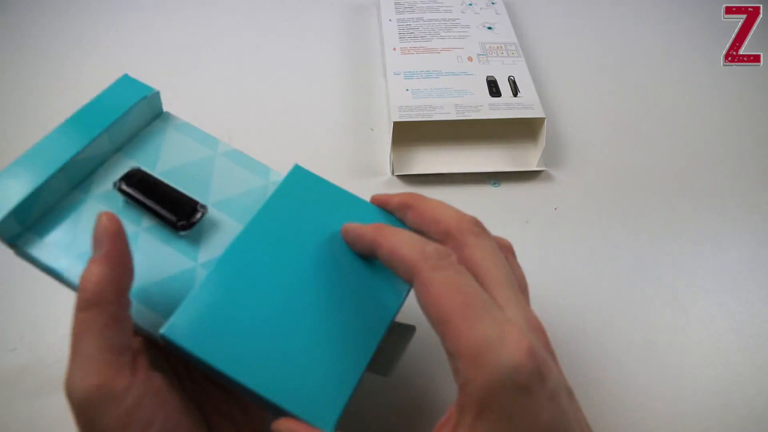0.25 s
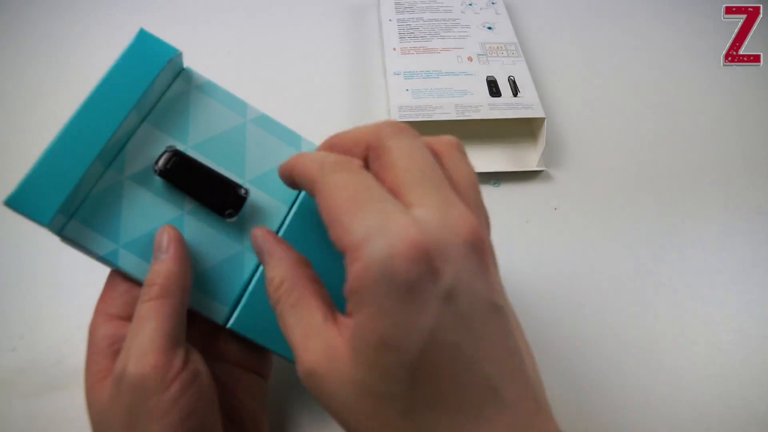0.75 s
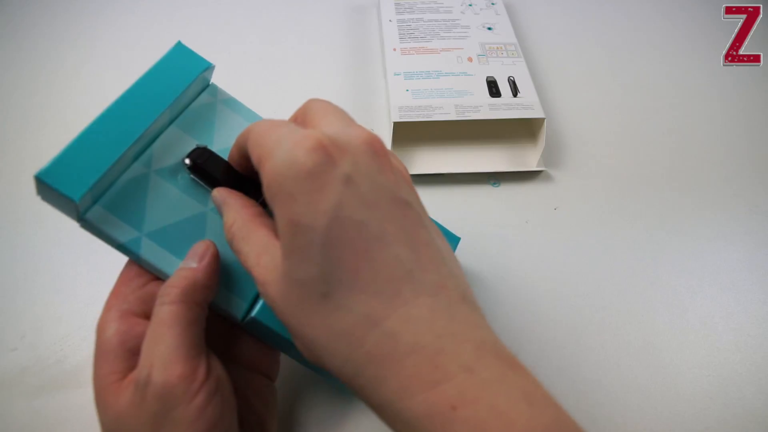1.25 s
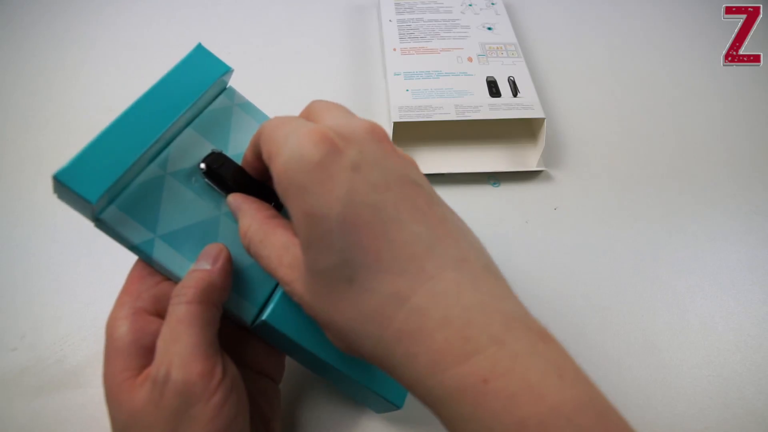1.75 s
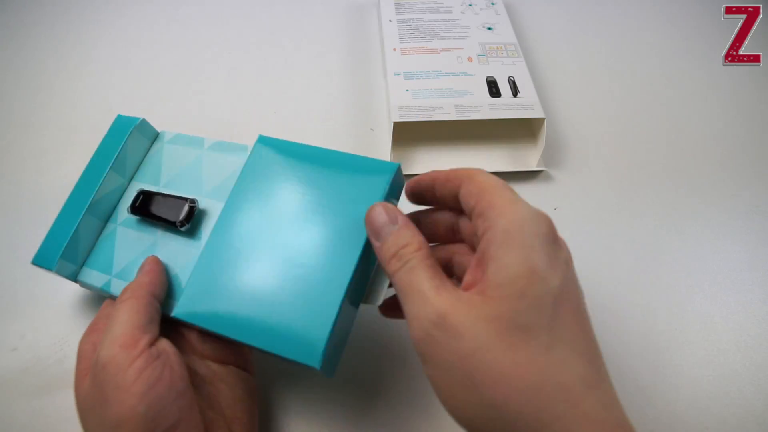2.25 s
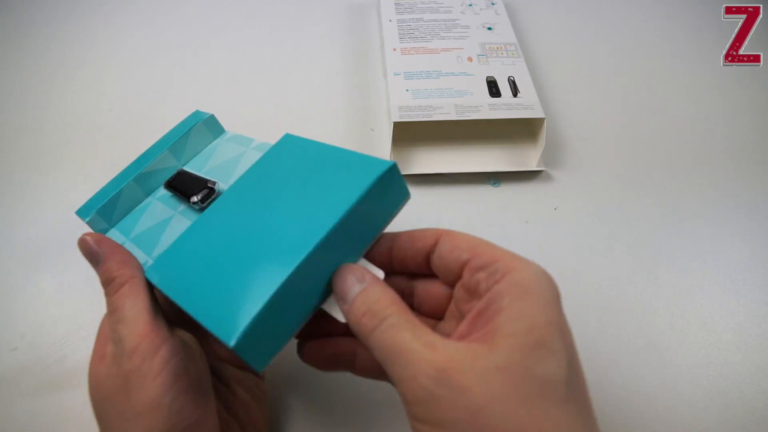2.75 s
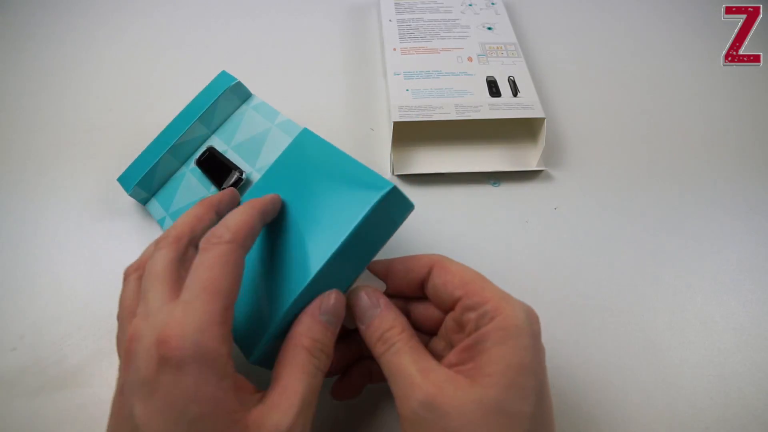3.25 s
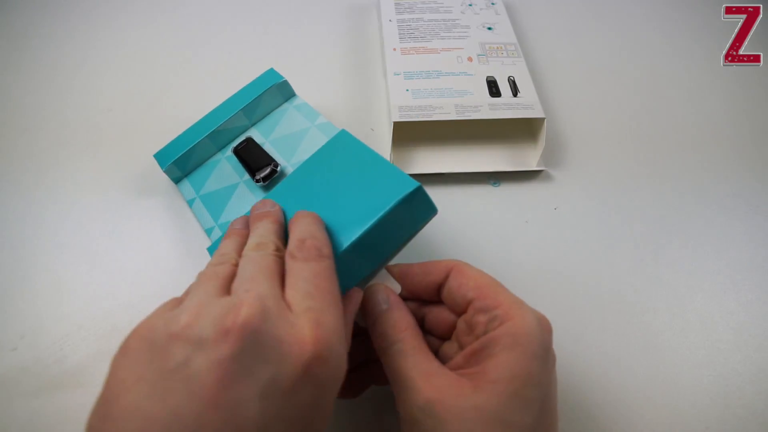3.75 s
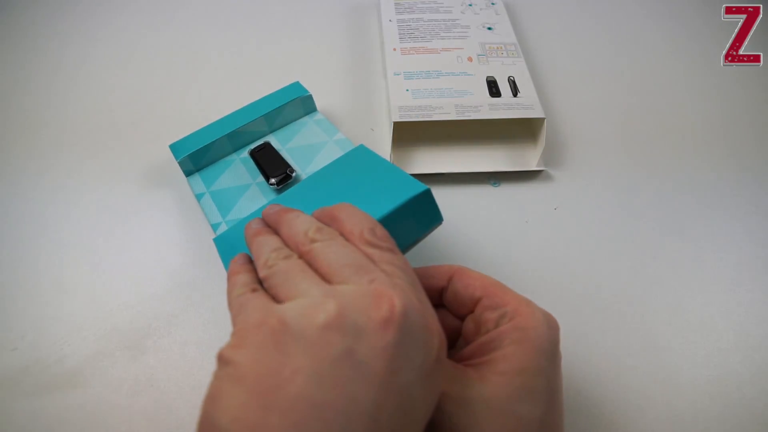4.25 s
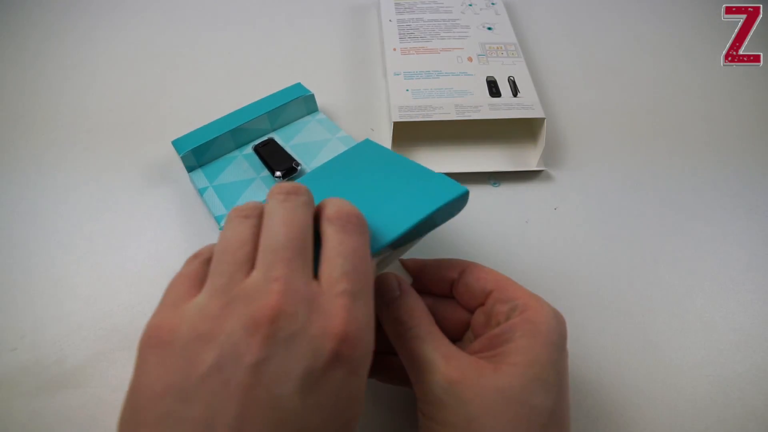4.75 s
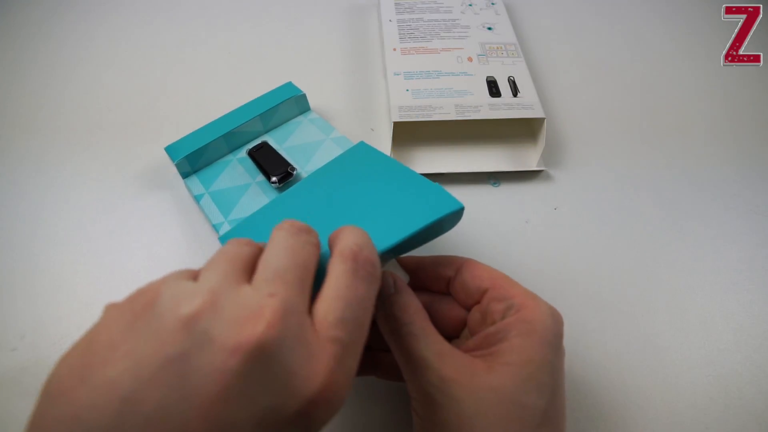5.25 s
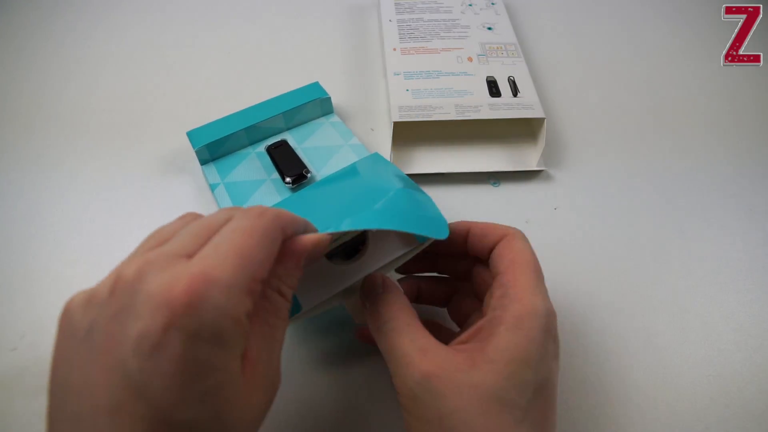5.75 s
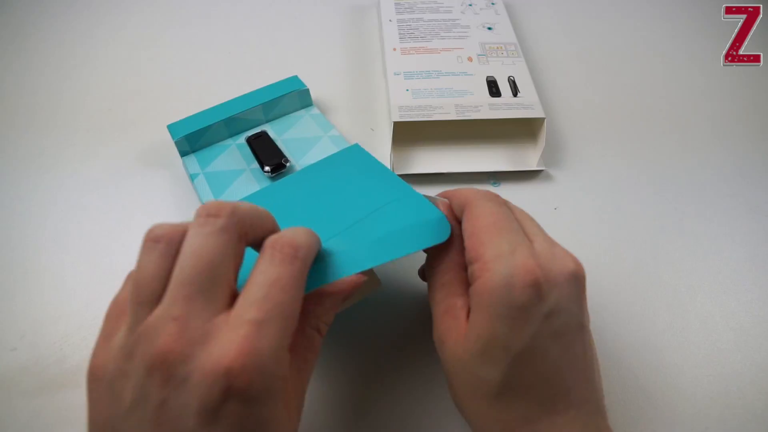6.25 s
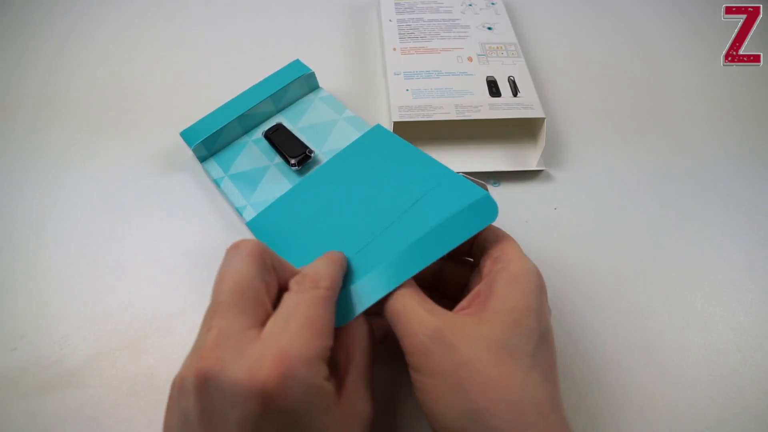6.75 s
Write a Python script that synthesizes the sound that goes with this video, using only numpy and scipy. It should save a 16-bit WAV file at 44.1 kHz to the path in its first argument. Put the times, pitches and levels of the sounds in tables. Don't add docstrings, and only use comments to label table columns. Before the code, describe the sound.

Close handling of a little card box: dry rubs, hollow pats, creasing ticks, a table rap, and a loud crack as a flap springs open.

```python
import sys
import numpy as np
from scipy import signal
from scipy.fft import rfft, irfft, next_fast_len
from scipy.io import wavfile
from scipy.ndimage import uniform_filter1d, map_coordinates

SR = 44100
rng = np.random.default_rng(int(sys.argv[2]) if len(sys.argv) > 2 else 0)


def to_wav(sig):
    pcm = np.clip(np.atleast_2d(sig), -1, 1) * 32767
    pcm = np.round(pcm).astype(np.int16)
    wavfile.write(sys.argv[1], SR, pcm.T)


def volts_from_db(level):
    exponent = np.asarray(level, float) / 20
    return 10 ** exponent


N = 308259


def unit(x):
    return x / np.sqrt(np.mean(x ** 2) + 1e-20)


def along(points, hz):
    f, v = np.transpose(points)
    return np.interp(np.log(hz + 1), np.log(f + 1), v)


def wobble(rate):
    knots = rng.standard_normal(int(N * rate / SR) + 4)
    return map_coordinates(knots, [np.arange(N) * rate / SR])


def filtered(x, response):
    m = next_fast_len(N + SR // 2)
    return irfft(rfft(x, m) * response(np.fft.rfftfreq(m, 1 / SR)), m)[:N]


def ring(x, modes):
    lo, hi = 0.42 * modes[0][0], 1.24 * modes[-1][0]

    def shape(f):
        total = 0
        for k, (center, width, db) in enumerate(modes):
            mode = 1j * f * width / (center * center - f * f + 1j * f * width)
            total = total + (-1) ** k * volts_from_db(db) * mode
        return total * 1j * f / (lo + 1j * f) / (1 + 1j * f / hi) ** 2

    def leveled(f):
        response = shape(f)
        return response / np.sqrt(np.mean(abs(response) ** 2))

    return filtered(x, leveled)


def grit(per_s, spread_db, smooth):
    size = volts_from_db(spread_db * np.minimum(rng.exponential(size=N), 2))
    slips = (rng.random(N) < per_s / SR) * size * rng.standard_normal(N)
    return unit(unit(slips) + smooth * rng.standard_normal(N))


def patchy(x, depth_db):
    z = signal.stft(x, nperseg=512)[2]
    field = uniform_filter1d(rng.standard_normal(z.shape), size=4, axis=0)
    field = uniform_filter1d(field, size=9, axis=1)
    return unit(signal.istft(z * volts_from_db(depth_db * unit(field)), nperseg=512)[1][:N])


def lone_modes(rows, waver):
    out, t = np.zeros(N + SR), np.arange(SR // 3) / SR
    for s, hz, db, rise, t60 in rows:
        drift = np.cumsum(rng.standard_normal(len(t)))
        phase = 2 * np.pi * hz * t + waver * np.sqrt(hz / 1000) * drift
        onset = 1 - np.exp(-(t / rise) ** 2)
        out[round(s * SR):][:len(t)] += volts_from_db(db - 60 * t / t60) * onset * np.sin(phase)
    return out[:N]


def contacts(rows, bodies, card_gain_db, hollow_gain_db, crackle_gain_db, blow):
    force, t = np.zeros((2, 3, N + SR)), np.arange(SR // 8) / SR
    for s, card_db, hollow_db, crackle_db, t60 in rows:
        burst = volts_from_db(-60 * t / np.clip(t60, .002, .12)) * rng.standard_normal((3, len(t)))
        burst[:, 0] = blow * np.linalg.norm(burst, axis=1)
        burst /= np.linalg.norm(burst, axis=1, keepdims=True)
        levels_db = [card_db + card_gain_db, hollow_db + hollow_gain_db, crackle_db + crackle_gain_db]
        size = np.sqrt(0.00057 * SR) * volts_from_db(levels_db)
        force[0, :, round(s * SR):][:, :len(t)] += size[:, None] * burst
        force[1, :, round(s * SR)] += size
    return np.array([sum(ring(f[:N], modes) for f, modes in zip(path, bodies)) for path in force])


# start_s, pressure_db
GRIP_PRESSURE = [(0, -55), (.37, -61), (.6, -58.5), (.66, -65), (.97, -76), (1.2, -57.5), (1.42, -55.5),
                 (1.52, -70), (1.62, -72), (1.95, -64), (2.45, -62), (2.72, -60.5), (3.2, -54.5),
                 (3.5, -62), (3.7, -53), (4.8, -57.5), (5.5, -56.5), (6.99, -57)]


def strokes(under_db, sudden, even, held, building=()):
    t = np.arange(N) / SR
    grip_db = np.interp(t, *np.transpose(GRIP_PRESSURE))
    power = volts_from_db(2 * (grip_db + np.reshape(under_db, (2, 1))))
    sudden_s, edge_s = 0.0043, 0.012
    shaped = [(r, sudden_s, 0, r[1]) for r in sudden]
    shaped += [(r, r[1], 0, r[1]) for r in even]
    shaped += [(r, r[1], 0, sudden_s) for r in building]
    shaped += [(r, edge_s, abs(r[1]), edge_s) for r in held]
    for (s, _, *peak_db), rise, hold, fall in shaped:
        first = max(round((s - 4 * abs(rise)) * SR), 0)
        near = slice(first, round((s + hold + 4 * abs(fall)) * SR))
        before = np.maximum(s - t[near], 0)
        after = np.maximum(t[near] - s - hold, 0)
        slope_db = -10 * (before / (abs(rise) + 1 / SR) + after / (abs(fall) + 1 / SR))
        power[:, near] += volts_from_db(2 * (np.reshape(peak_db, (2, 1)) + slope_db))
    return 10 * np.log10(power)


# pitch_hz, density_db (dB per Hz)
HUSH_SPECTRUM = [(15, -24), (27, 0), (40, 1.5), (68, -12.5), (200, -19), (600, -17.5), (1500, -23.5),
                 (4000, -34.5), (8000, -37.5), (15800, -41)]
# pitch_hz, level_db (rms)
WHINE_TONES = [(2000, -78), (3000, -81.5), (4000, -88)]


def room_tone():
    noise = filtered(rng.standard_normal(N), lambda hz: volts_from_db(along(HUSH_SPECTRUM, hz)))
    hush = volts_from_db(-58.5 + 0.14 * wobble(2.83)) * unit(noise)
    t = np.arange(N) / SR
    return hush + sum(volts_from_db(db + 2.5) * np.sin(2 * np.pi * hz * t) for hz, db in WHINE_TONES)


# pitch_hz, t60_s
ROOM_DECAY = [(200, 0.15), (1000, 0.26), (4000, 0.28), (12000, 0.2)]


def room(x):
    out, step, delay = np.zeros(N + SR), SR // 3, 130
    for a in range(0, N, step):
        hz, t, z = signal.stft(rng.standard_normal(SR // 2), SR, nperseg=256)
        decay = volts_from_db(-60 * t / along(ROOM_DECAY, hz)[:, None])
        tail = signal.istft(z * decay, SR, nperseg=256)[1]
        wet = signal.fftconvolve(x[a:a + step], tail / np.linalg.norm(tail))
        out[a + delay:][:len(wet)] += wet[:N + SR - a - delay]
    return out[:N]


# start_s, pitch_hz, level_db, rise_s, t60_s
TABLE_PUSHES = [(.182, 434, -35, 0.003, 0.091), (.3, 270, -46, 0.0091, 0.095),
                (2.15, 125, -52, 0.039, 0.46), (2.511, 189, -42.5, 0.0032, 0.12),
                (3.047, 180, -40, 0.0024, 0.17), (3.346, 135, -31, 0.0092, 0.13),
                (3.359, 375, -39, 0.002, 0.06), (3.42, 370, -46, .003, .08),
                (3.376, 123, -32.5, 0.0039, 0.21), (3.376, 361, -35.5, 0.0016, 0.069),
                (3.92, 194, -46, 0.0049, 0.1), (4.525, 195, -47.5, 0.0024, .1), (4.88, 150, -54, .01, 0.16),
                (3.16, 130, -47, .01, 0.155), (3.76, 349, -48, .01, 0.2), (4.09, 477, -39, 0.0068, 0.16),
                (4.965, 233, -47.5, 0.0056, .12), (5.43, 171, -53, 0.0091, 0.16),
                (5.66, 190, -51, .005, 0.11), (3.29, 420, -44, .008, .12), (3.24, 300, -49, .01, .15),
                (3.47, 128, -48, .02, .3), (3.62, 280, -50, .01, .15), (4.18, 300, -50, .01, .2)]


def table_booms():
    return lone_modes(TABLE_PUSHES, waver=0.03)


# pitch_hz, width_hz, level_db
SQUEAK_BAND = [(4400, 3600, -1), (5640, 800, 6), (6900, 880, 0)]
# pitch_hz, width_hz, level_db
AIR_BAND = [(9100, 2600, -2.5), (11600, 2900, -4), (13900, 2300, -10.5)]
# start_s, fade_s (per 10 dB), squeak_db, air_db
SUDDEN_SLIPS = [(0.001, .08, -68, -66), (1.617, -0.3, -67, -83), (1.804, -0.04, -55, -72),
                (2.26, 0.6, -63, -75), (2.89, 0.4, -58, -68), (3.536, 0.04, -61, -80),
                (3.942, -0.02, -42, -66), (4.372, 0.06, -44.5, -56), (5.0585, .06, -57, -63),
                (4.98, .06, -62, -67), (5.193, .04, -56, -75), (5.159, .03, -62, -75),
                (5.538, 0.45, -64, -70), (6.572, 0.03, -48, -51)]
# peak_s, slope_s (per 10 dB), squeak_db, air_db
EVEN_GLIDES = [(.27, 0.02, -55, -63), (1.283, 0.02, -62, -72), (1.45, 0, -68, -73), (2.02, 0, -75, -76),
               (2.17, -0.03, -64, -61.5), (2.45, -0.1, -58, -69), (2.67, 0, -59.5, -77),
               (3.02, 0.14, -62.5, -72), (4.876, 0.12, -61, -72), (5.22, 0, -57, -77),
               (5.485, 0.04, -51.5, -71), (5.6, 2, -63.5, -79), (6.247, 0.03, -44, -58),
               (6.357, 0.025, -45, -55), (6.92, 0.1, -55, -66.5)]
# start_s, length_s, squeak_db, air_db
STEADY_SLIDES = [(0.145, .2, -60, -72), (0.413, 0.063, -59, -65), (2.799, 0.065, -55, -62.5),
                 (0.56, 0.069, -64, -72), (1.68, 0.065, -62.5, -82), (3.71, 0.4, -59.5, -74),
                 (3.832, .14, -53.5, -67), (3.87, 0.022, -49.5, -67), (4.47, 0.062, -49, -55.5),
                 (5.07, .04, -60, -70), (2.58, .12, -61, -78), (4.28, .04, -63, -74),
                 (5.448, 0.038, -54.5, -68), (5.88, 0.066, -56.5, -74), (6.014, 0.086, -44, -54.5),
                 (6.103, 0.053, -57, -74), (6.449, 0.049, -55.5, -68), (6.529, 0.12, -53.5, -66),
                 (6.747, 0.061, -54, -70), (6.84, 0.033, -54, -67.5)]


def sliding():
    squeak_db, air_db = strokes([-13, -29], SUDDEN_SLIPS, EVEN_GLIDES, STEADY_SLIDES)
    speed = wobble(35)
    squeak = volts_from_db(squeak_db - 5.5 + 1.65 * speed) * grit(4000, spread_db=3.5, smooth=0.91)
    air = volts_from_db(air_db - 3.5 + 1.5 * speed) * grit(4960, spread_db=-8.0, smooth=1.9)
    return ring(squeak, SQUEAK_BAND) + ring(air, AIR_BAND)


# pitch_hz, width_hz, level_db
BOX_HOLLOW = [(326, 76, -9), (465.5, 90, -3.5), (655.3, 41, 4.5), (809, 47, -3.5)]
# pitch_hz, width_hz, level_db
CARD_PANELS = [(1030, 362, 0), (1311, 159, 5), (1426, 240, 1.5), (1843, 390, -1.5), (2100, 390, -2),
               (2780, 426, -7), (3256, 580, -11)]
# start_s, fade_s (per 10 dB), hollow_db, card_db
CATCHING_RUBS = [(0.001, 0.1, -49, -58), (0.179, -0.02, -41, -48), (1.805, 0.03, -57, -46),
                 (1.917, 0.1, -55, -54), (2.1, 0.05, -50, -52.5), (2.272, 0.13, -49, -48.5),
                 (2.516, .04, -46, -45), (2.8, .07, -42, -51), (2.93, .06, -47, -51), (3.48, 0.2, -53, -61),
                 (5.194, .04, -52, -50), (5.879, .05, -42, -52), (1.623, .05, -60, -50),
                 (2.139, .05, -45, -52), (4.37, 0.26, -51, -40), (6.25, 0.06, -53, -48.5),
                 (6.665, 0.01, -46, -48)]
# peak_s, build_s (per 10 dB), hollow_db, card_db
BUILDING_RUBS = [
    (.61, 0.8, -52, -58.5),
    (1.462, 0.03, -47, -49.5),
    (3.015, 0.04, -43, -46),
    (5.12, 0.1, -52, -56),
]
# peak_s, slope_s (per 10 dB), hollow_db, card_db
SWELLING_RUBS = [(.27, 0.03, -47, -48), (1.045, 0.05, -51, -53), (3.33, 0.1, -48, -52),
                 (3.948, 0.06, -41, -43), (4.095, 0.03, -41, -43), (4.5, 0.12, -36.5, -42),
                 (5.085, 0.0851, -38, -48), (6.245, 0.04, -44, -47), (6.357, 0.04, -51, -47),
                 (6.877, 0.025, -40, -45)]
# start_s, length_s, hollow_db, card_db
STEADY_RUBS = [(0.218, 0.11, -49, -50.5), (4.374, 0.036, -52, -39), (4.45, 0.068, -52, -45),
               (0.488, 0.08, -47.5, -66), (1.144, 0.11, -58, -59), (1.28, .08, -58, -54),
               (1.692, 0.069, -56, -49), (1.95, .08, -49.5, -58), (2.152, 0.03, -50, -57),
               (3.545, 0.072, -49, -56), (3.993, 0.13, -45, -48), (4.9, 0.18, -49.5, -58.5),
               (4.85, .03, -55, -55), (4.95, .02, -56, -53), (5.623, 0.048, -48, -53.5),
               (5.745, .07, -50.5, -55), (5.886, 0.045, -49, -46), (6.01, 0.096, -52, -48.5),
               (6.569, 0.022, -49.5, -45), (6.604, 0.03, -56, -55), (6.75, .06, -46.5, -51),
               (6.84, 0.042, -44, -48), (6.903, 0.056, -52, -51)]


def rubbing():
    hollow_db, card_db = strokes([0.5, -0.4], CATCHING_RUBS, SWELLING_RUBS, STEADY_RUBS, BUILDING_RUBS)
    press = wobble(25)
    hollow_drag = patchy(grit(400, spread_db=2.5, smooth=0.9), depth_db=3.0)
    hollow = volts_from_db(hollow_db - 5.0 + 0.93 * press + 1.4 * wobble(30)) * hollow_drag
    card_drag = patchy(grit(350, spread_db=2.5, smooth=0.9), depth_db=3.0)
    card = volts_from_db(card_db - 1.38 + 0.49 * press + 1.75 * wobble(45)) * card_drag
    return ring(hollow, BOX_HOLLOW) + ring(card, CARD_PANELS)


# pitch_hz, width_hz, level_db
CARD_CRACKLE = [(4360, 2300, 6), (6070, 710, 9), (6900, 250, 4.5), (9280, 960, 2.5), (10200, 1940, -4.5),
                (13500, 3000, -41.5)]
# start_s, card_db, hollow_db
FINGER_PATS = [(.0604, -60, -38), (.265, -33, -30), (0.3274, -35, -65), (0.7907, -39.5, -70),
               (.8774, -59, -41.5), (.9414, -50, -38.5), (1.038, -33, -38), (1.3748, -39, -43),
               (1.4454, -36, -36), (1.453, -31, -35), (1.03, -37, -48), (1.6237, -33.5, -46),
               (1.7, -43, -54), (1.723, -26, -39), (1.749, -41, -43), (1.7105, -28, -54),
               (1.7365, -27, -48), (1.694, -31, -50), (1.753, -30, -50), (1.167, -38, -50),
               (1.198, -38, -50), (1.224, -38, -50), (1.531, -43, -55), (5.408, -41, -50),
               (5.611, -37, -46), (5.653, -34, -45), (5.742, -37, -46), (5.894, -31, -38),
               (6.004, -33, -44), (6.573, -31, -44), (2.922, -37, -44), (1.7887, -35, -55),
               (1.9524, -49, -42), (2.0086, -35, -48), (2.0826, -45, -40), (2.355, -42, -44.5),
               (2.5999, -37, -49), (1.9165, -27, -46), (2.2714, -36, -29.5), (2.4714, -36, -38.5),
               (2.5108, -25, -27), (3.0034, -37, -62.5), (3.2421, -35.5, -48), (3.409, -33, -79),
               (3.6242, -49, -42.5), (4.0385, -45, -32), (4.082, -31, -41), (4.9023, -50, -41),
               (4.9708, -55, -37), (5.0654, -42, -36), (5.4348, -37, -44), (5.4777, -35, -44.5),
               (5.6308, -41, -39), (5.6621, -40, -37), (6.223, -35, -51), (6.236, -30, -38),
               (5.8132, -40, -41), (5.9556, -28, -41), (6.8737, -37, -35)]
# start_s, card_db, hollow_db, crackle_db
CREASE_TICKS = [(.0144, -36, -70, -52), (.184, -29, -39, -53), (.2444, -46, -42, -58),
                (0.5975, -36, -36, -52), (1.616, -39, -60, -55), (1.6778, -25.5, -41.5, -49),
                (1.8033, -26.5, -33, -43), (2.0988, -29, -33, -49), (2.139, -29, -34, -49),
                (2.166, -45, -50, -50), (2.034, -51, -55, -58), (2.2576, -27.5, -36.5, -48),
                (2.388, -31, -39.5, -43), (2.4408, -34, -64, -45), (2.799, -36, -43, -51),
                (2.9317, -37, -38, -53), (3.19, -35, -44, -58), (3.3135, -33, -39, -50),
                (3.543, -32, -57, -60), (3.535, -47, -62, -49), (3.9316, -26, -32, -45),
                (3.9387, -34, -27.5, -44), (3.9948, -32, -30.5, -49.5), (5.099, -37, -50, -50),
                (5.538, -44, -57, -44.5), (5.1935, -29, -40, -48), (4.9797, -45, -50, -48),
                (5.0585, -45, -50, -47), (4.866, -48, -55, -54), (5.7693, -37.5, -45, -54),
                (5.8798, -30, -29, -45), (6.0117, -45, -56, -56), (6.358, -33, -40, -44),
                (6.567, -36, -41, -48), (6.6335, -34, -43, -52), (6.6625, -27, -32, -44),
                (6.784, -33, -48, -52), (6.8379, -26.5, -36, -40)]


def pats_and_ticks():
    crackle_under_card_db, pat_t60_s, tick_t60_s = -26, .021, 0.031
    rows = [(s, card_db, hollow_db, card_db + crackle_under_card_db, pat_t60_s)
            for s, card_db, hollow_db in FINGER_PATS]
    rows += [(*row, tick_t60_s) for row in CREASE_TICKS]
    return contacts(sorted(rows), (CARD_PANELS, BOX_HOLLOW, CARD_CRACKLE),
                    card_gain_db=-7.5, hollow_gain_db=0.0, crackle_gain_db=-2.0, blow=1.9)


# start_s, card_db, hollow_db, crackle_db, t60_s
EDGE_RAPS = [
    (3.0462, -12, -19, -44, 0.028),
    (3.09, -48, -37, -55, .02),
    (3.11, -34, -39, -68.5, 0.026),
]
# pitch_hz, width_hz, level_db
EDGE_CARD = [(1120, 220, 2.5), (1500, 610, -4), (1960, 310, -1), (2450, 530, -7)]
# pitch_hz, width_hz, level_db
RESTING_HOLLOW = [(350, 40, -3), (494, 220, -11.5), (646, 33, 3), (823, 64, -4)]


def edge_raps():
    return contacts(EDGE_RAPS, (EDGE_CARD, RESTING_HOLLOW, CARD_CRACKLE),
                    card_gain_db=0.0, hollow_gain_db=6.5, crackle_gain_db=9.5, blow=1.1)


# start_s, pitch_hz, level_db, rise_s, t60_s
PANEL_PINGS = [(3.885, 5500, -34, 0.011, 0.12), (3.088, 1152, -31, .004, .06),
               (3.985, 1210, -37, 0.017, 0.5), (4.368, 1101, -31.5, 0.0083, 0.29),
               (4.523, 2100, -7, 0.00045, 0.012), (4.523, 6900, -10, 0.00077, 0.012),
               (4.5345, 5980, -11.5, 0.0018, 0.018), (4.5685, 2060, -10.5, 0.00056, 0.03),
               (4.578, 1050, -20, 0.0027, 0.15), (4.524, 8800, -26, 0.0011, 0.057),
               (4.5765, 3170, -16, .0008, .05), (4.5765, 4710, -16.5, 0.00063, .04),
               (4.5765, 6900, -9, 0.00067, .02), (4.585, 8550, -26, .001, 0.013),
               (5.231, 5500, -27, .0008, 0.026), (5.233, 1690, -32, .001, .08),
               (4.579, 1540, -22, .002, .1), (4.534, 7200, -24, .001, .015), (4.53, 1400, -27, .003, .12),
               (3.89, 6100, -38, .015, .1), (3.89, 6900, -39, .01, .08), (5.232, 3150, -38, .001, .03),
               (5.231, 9250, -28, .0007, .02), (4.523, 3200, -20, .0007, .025),
               (4.371, 3150, -36, .001, .02), (5.194, 1100, -38, .001, .02),
               (6.25, 1890, -29.5, .001, 0.065), (6.25, 697, -34.5, 0.0018, 0.11),
               (6.6625, 464, -27.5, 0.0021, 0.026), (6.838, 2160, -36.5, .001, .03),
               (5.231, 7120, -24, 0.00063, 0.018), (5.232, 850, -31, 0.0011, 0.18),
               (5.234, 1996, -27, 0.0015, 0.093), (6.015, 680, -33.5, 0.0063, 0.1),
               (6.663, 694, -33, 0.0019, 0.22)]


def panel_pings():
    return lone_modes(PANEL_PINGS, waver=0.088)


# start_s, card_db, hollow_db, crackle_db, t60_s
FLAP_SNAPS = [(4.352, -42, -52, -50.5, 0.013), (4.486, -30, -48, -52, .022),
              (4.371, -21.5, -48, -36, 0.015), (4.5225, -10, -33, -29, 0.022), (4.531, -18, -34, -31, 0.04),
              (4.543, -22, -38, -33, 0.04), (4.5685, -10, -22, -34, 0.025), (4.5762, 2.5, -17, -9.5, 0.026),
              (4.588, -10, -26, -18, 0.018), (4.613, -17, -21, -40, 0.03), (5.2308, -16, -34, -24.5, 0.018),
              (5.2375, -25, -38, -32, 0.01), (6.249, -21, -35, -40, 0.0091)]
# pitch_hz, width_hz, level_db
FLAP_CARD = [(1030, 280, -0.5), (1380, 240, 0), (1590, 186, 0.5), (2134, 140, -3), (2490, 350, -9),
             (3164, 290, -1)]
# pitch_hz, width_hz, level_db
OPENING_HOLLOW = [(257, 60, -16), (425, 170, -7), (680, 224, -0.5), (788, 62, 4.5)]
# pitch_hz, width_hz, level_db
FLAP_FIBRES = [(3750, 470, -4), (4630, 810, -0.5), (5570, 810, -1.5), (6660, 850, -5), (8800, 1600, -6.5),
               (10460, 1800, -8), (12700, 2200, -14.5)]


def flap_snaps():
    return contacts(FLAP_SNAPS, (FLAP_CARD, OPENING_HOLLOW, FLAP_FIBRES),
                    card_gain_db=-4.5, hollow_gain_db=8.0, crackle_gain_db=1.5, blow=0.31)


def scene():
    hush, booms = room_tone(), table_booms()
    rub = sliding() + rubbing()
    near, sent = pats_and_ticks() + edge_raps() + flap_snaps()
    pings = panel_pings()
    dull_pings = filtered(pings, lambda hz: 1 / (1 + (hz / 4500) ** 2))
    walls = room(volts_from_db(-3.0) * sent + volts_from_db(-6) * dull_pings + volts_from_db(-9.0) * rub)
    box = filtered(near + pings + walls, lambda hz: (1j * hz / (110 + 1j * hz)) ** 2)
    return (box + rub + booms + hush)[None]


def low_pass(x):
    return signal.sosfilt(signal.butter(12, 15850, fs=SR, output="sos"), x)


def record(dry):
    rounded = dry[0] / (1 + abs(dry[0] / .85) ** 4) ** (1 / 4)
    mix = filtered(rounded, lambda hz: hz < 15850)[None]
    return low_pass(mix)


dry = scene()
out = record(dry)
to_wav(out)
```